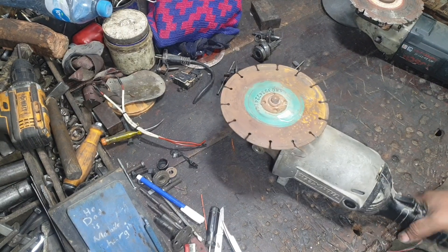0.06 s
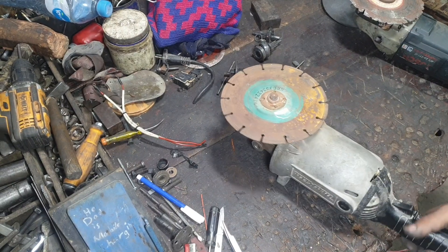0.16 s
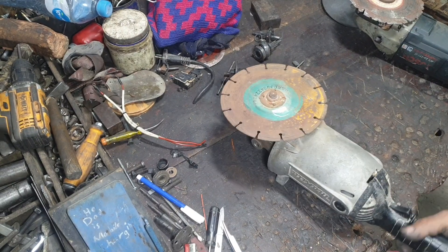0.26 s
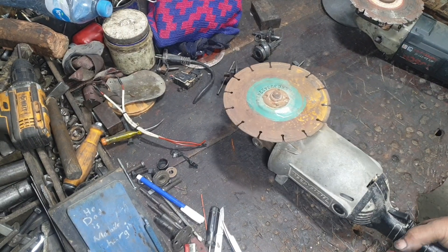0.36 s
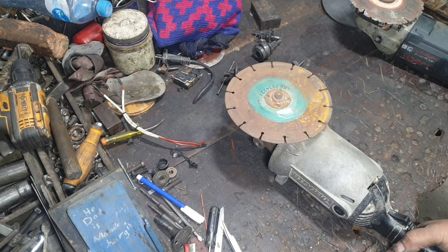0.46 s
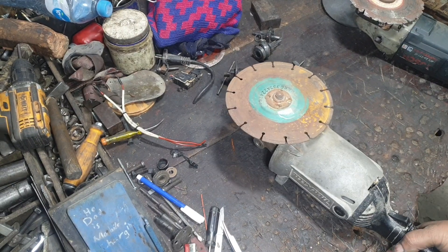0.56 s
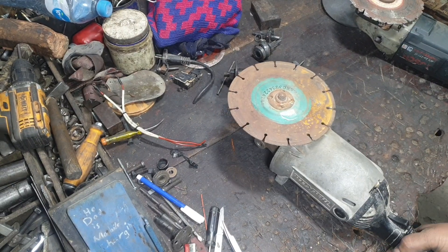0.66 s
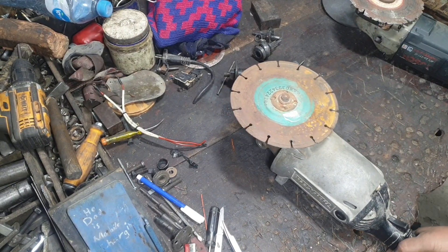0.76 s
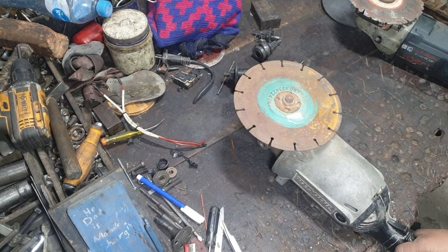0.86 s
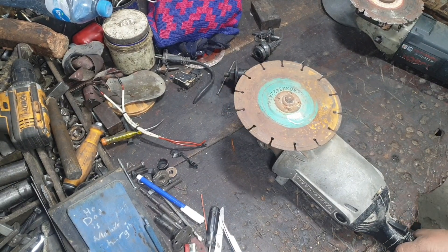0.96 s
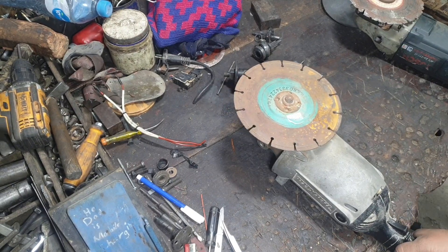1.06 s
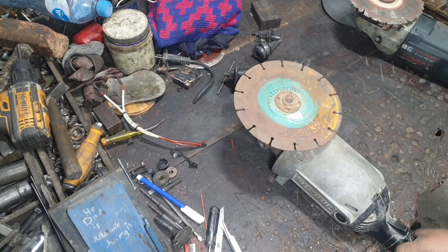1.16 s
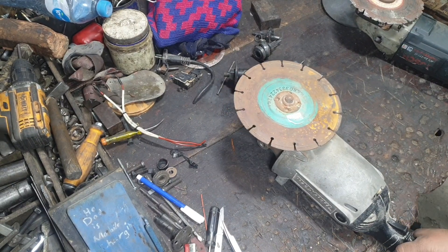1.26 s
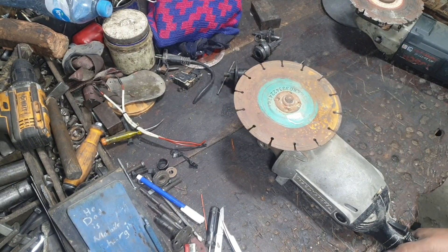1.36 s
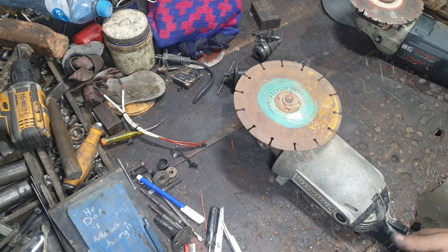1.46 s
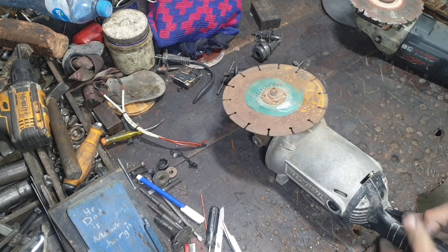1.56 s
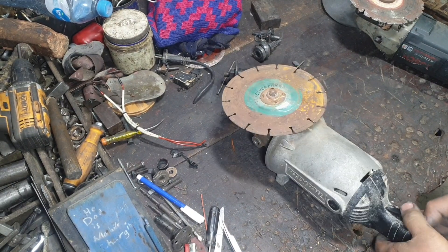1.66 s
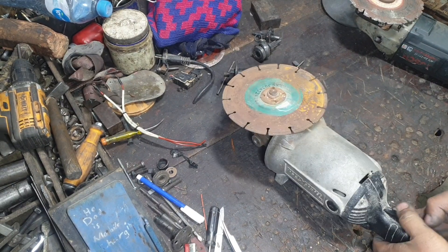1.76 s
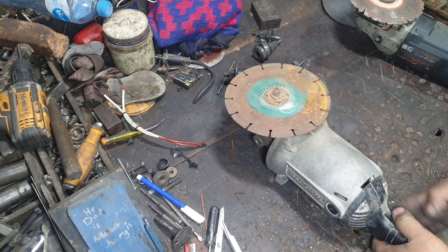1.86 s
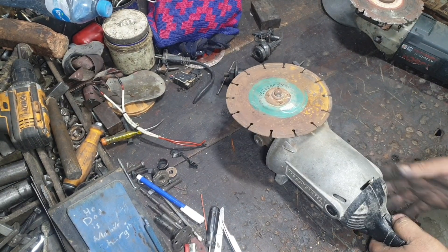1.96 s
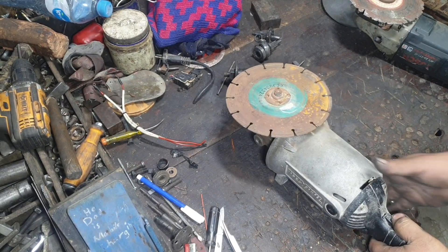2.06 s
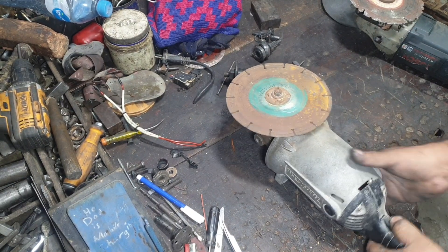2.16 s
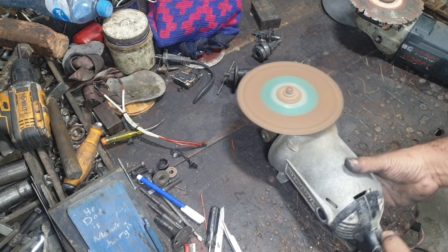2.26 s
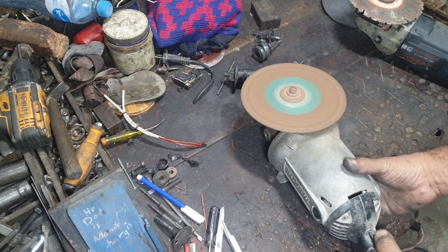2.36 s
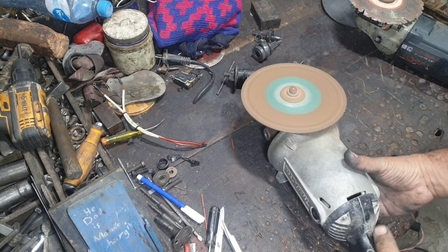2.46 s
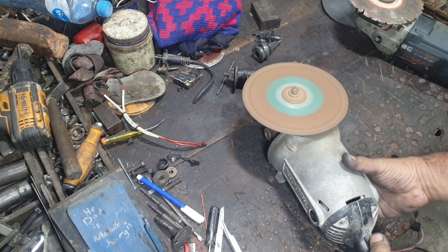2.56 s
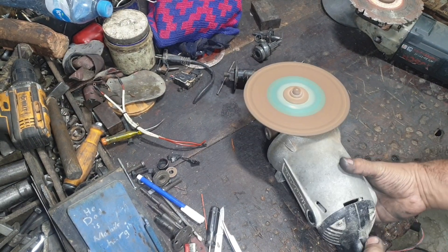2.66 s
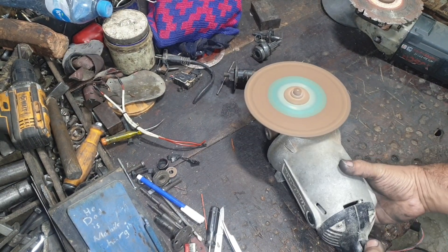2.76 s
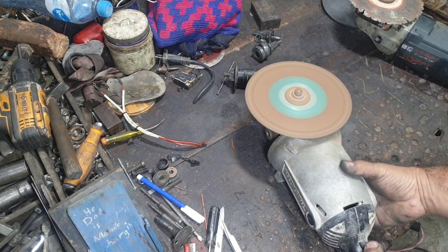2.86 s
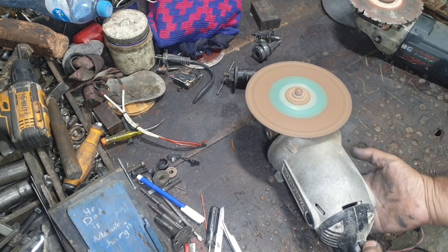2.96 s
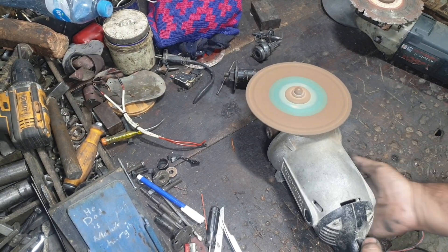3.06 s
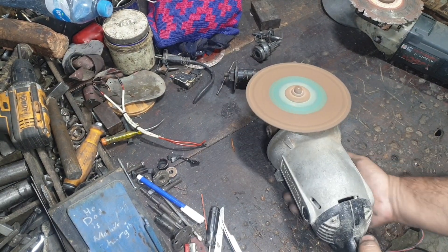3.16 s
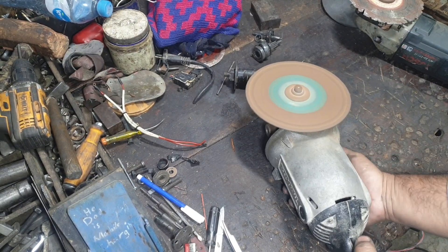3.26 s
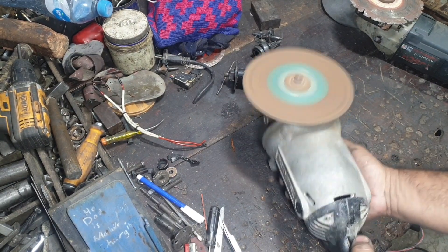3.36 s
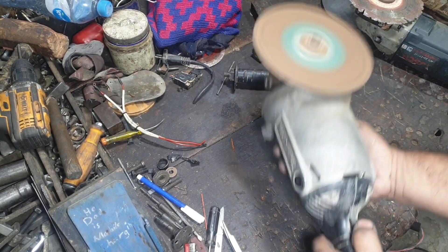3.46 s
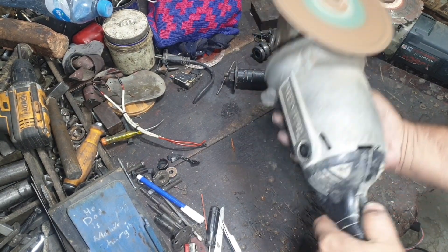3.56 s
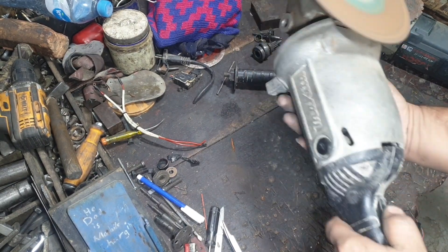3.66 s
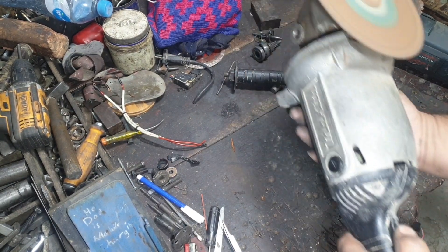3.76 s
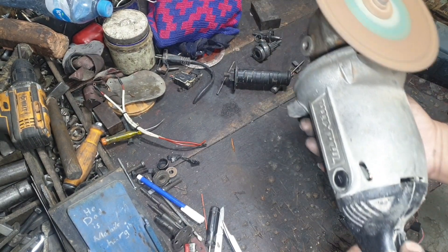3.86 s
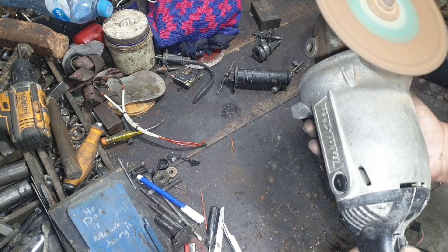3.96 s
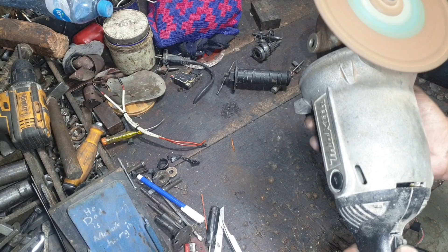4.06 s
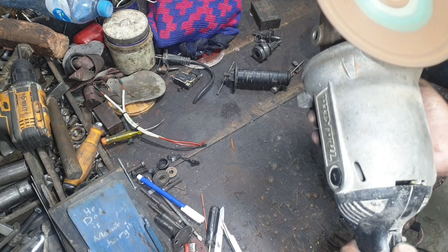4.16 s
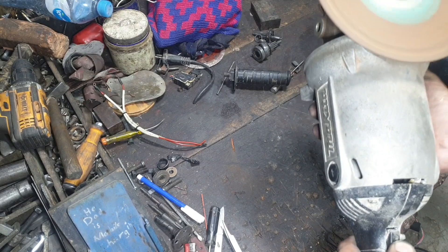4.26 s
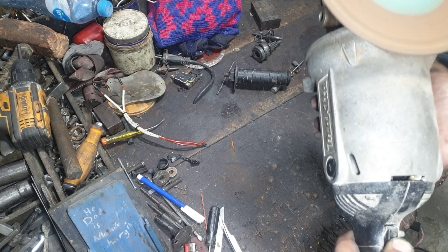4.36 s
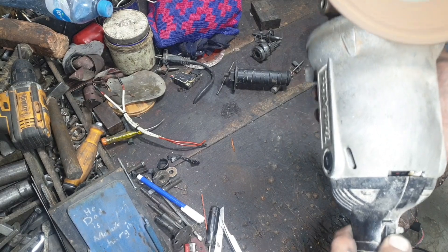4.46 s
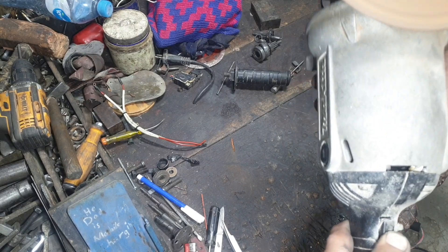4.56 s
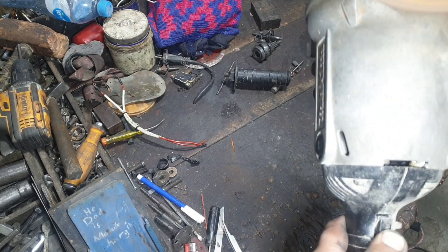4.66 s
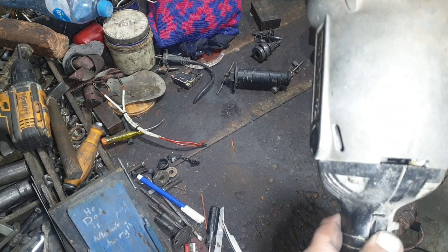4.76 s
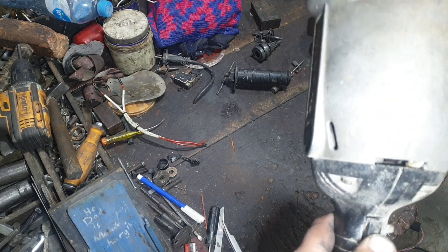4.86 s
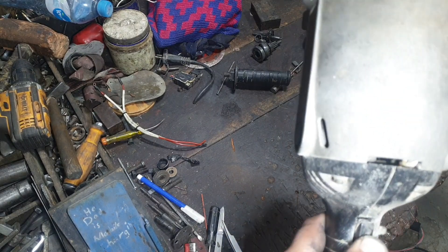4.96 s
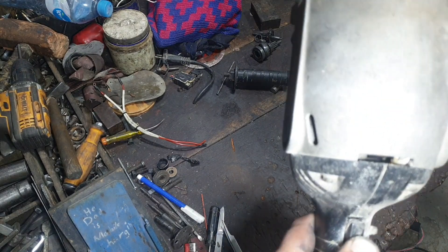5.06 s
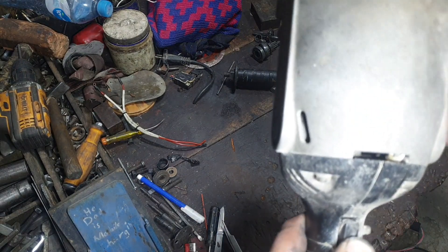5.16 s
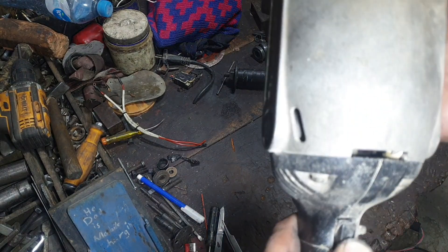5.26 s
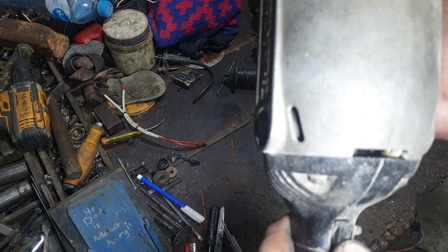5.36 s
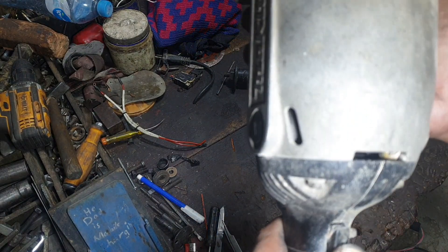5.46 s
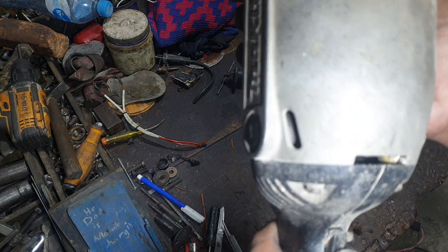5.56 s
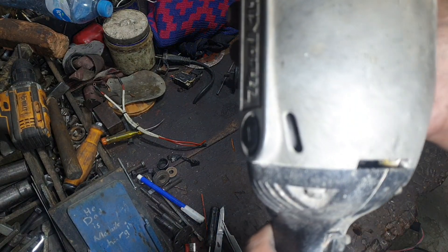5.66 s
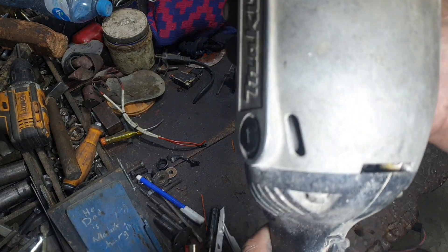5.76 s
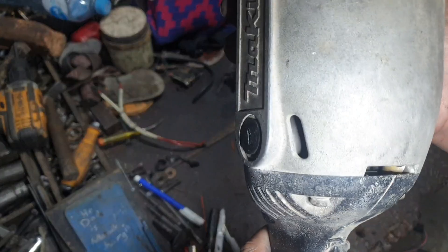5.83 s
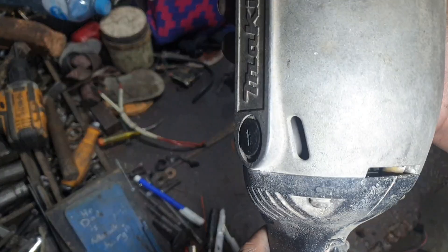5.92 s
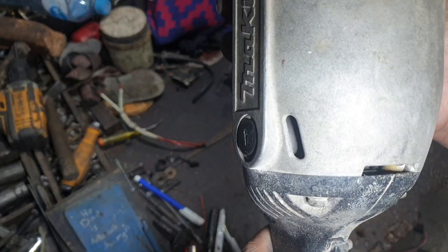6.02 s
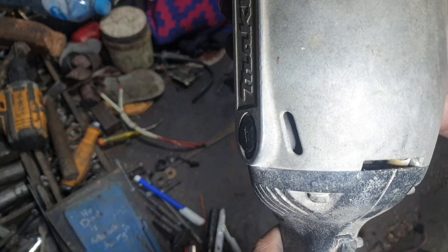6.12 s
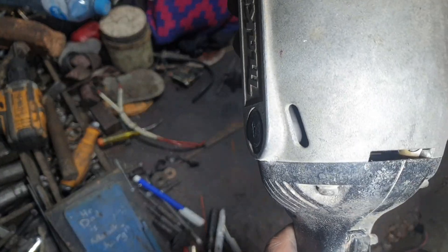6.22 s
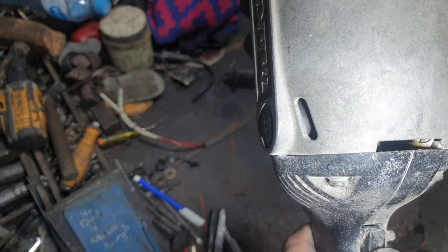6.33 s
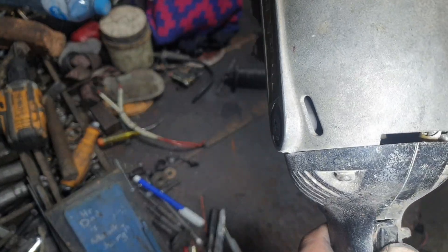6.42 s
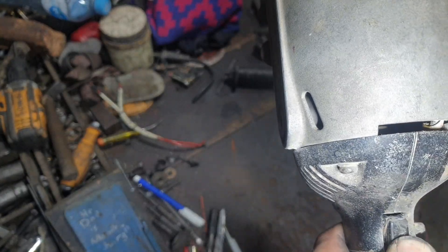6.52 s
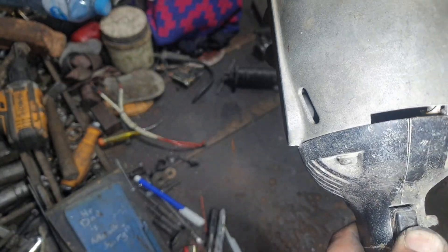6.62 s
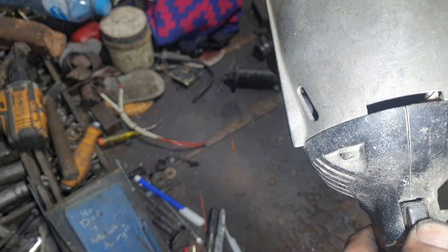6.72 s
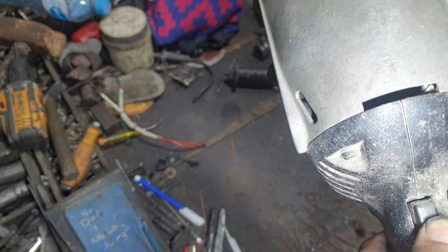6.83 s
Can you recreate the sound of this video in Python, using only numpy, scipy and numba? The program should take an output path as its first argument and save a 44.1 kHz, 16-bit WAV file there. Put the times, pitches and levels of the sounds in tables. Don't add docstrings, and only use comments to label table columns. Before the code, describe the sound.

After soft rustles and small clicks, a big grinder kicks into life on a metal bench, sags in pitch, then surges to a full whining roar.

```python
import sys
import numpy as np
from scipy import signal
from scipy.fft import rfft, irfft, next_fast_len
from scipy.io import wavfile
from scipy.ndimage import uniform_filter1d, map_coordinates
from numba import njit

SR = 44100
rng = np.random.default_rng(int(sys.argv[2]) if len(sys.argv) > 2 else 0)


def gain_from_decibels(decibels):
    exponent = np.asarray(decibels, float) / 20
    return 10 ** exponent


def transcribe(signal):
    frames = np.atleast_2d(signal).T
    limited = np.clip(frames, -1, 1)
    pcm = np.round(limited * 32767).astype(np.int16)
    wavfile.write(sys.argv[1], SR, pcm)


N = 303849
T = np.arange(N) / SR
SIZE = next_fast_len(N)
HZ = np.arange(SIZE // 2 + 1) * SR / SIZE


# [f/Hz, left minus right level/dB]
PORT_BALANCE = [(60, -4), (400, -9), (800, -4.5), (2400, -6.5), (4400, -12), (6000, -16.5), (7300, 0),
                (8700, 23), (10500, 4), (15000, 5.5)]
# [f/Hz, correlation]
PORT_LIKENESS = [(60, 1), (300, 0.88), (640, .97), (1400, 0.62), (3000, 0.22), (9000, 0.087)]

# [f/Hz, level/dB per Hz]
DRONE_COLOUR = [(15, -49), (25, -28), (37, -18), (54, -2), (99, 5), (128, 1.5), (150, -5), (200, -68),
                (330, -120)]
RUMBLE_COLOUR = [(82, -47), (140, -2), (162, -2), (210, -6.5), (286, -8.5), (500, -18.5), (650, -47),
                 (1100, -120)]
HISS_COLOUR = [(380, 3), (500, 0), (1300, -1.5), (2900, -9.5), (4200, -13), (5400, -10.5), (6300, -18),
               (7400, -29), (10500, -26), (12500, -33), (15500, -40)]
RUSTLE_COLOUR = [(1800, 5), (3500, 0), (5500, 4), (7500, -15), (10500, -12), (13000, -12), (15500, -14)]
# [peak t/s, rise t/s, fall t/s, level/dB]
DRONE_SWELLS = [
    (.05, .3, 0.076, -39.5),
    (.52, 0.19, 0.1, -58),
    (.93, 0.14, 0.12, -47),
]
HISS_SWELLS = [
    (.3, 0.65, 0.49, -71),
    (.97, .03, .05, -66),
]
RUSTLE_SWELLS = [
    (.29, 0.069, .2, -77),
    (.986, .01, .05, -67),
    (1.652, .003, 0.02, -59),
    (1.72, 0.11, 0.09, -59.5),
    (1.83, 0.04, 0.035, -57),
    (2.04, .02, .03, -66),
    (2.275, .02, .1, -70),
]
HAND_RUB = [
    (1.93, 0.074, 0.073, -64),
    (2.08, .06, .06, -53.5),
]
# [f/Hz, swells (peak t/s, rise t/s, fall t/s, level/dB)]
ENGINE_NOTES = [
    (116.3, [(.3, .35, 0.25, -42), (.55, 0.068, 0.13, -43)]),
    (95, [(.1, .1, .1, -46), (1.05, 0.046, .1, -42), (1.8, 0.14, 0.18, -46)]),
    (136, [(.88, 0.077, 0.15, -41.5), (1.2, .1, 0.089, -48), (1.45, 0.071, 0.19, -46.5), (1.92, 0.099, 0.045, -47), (2.12, .07, 0.051, -43)]),
    (68.6, [(1.35, .06, .06, -48), (1.97, 0.091, 0.067, -57), (2.2, 0.086, 0.13, -50)]),
]
# [t/s, f/Hz, level/dB]
SCRAPE_PATH = [
    (.43, 5200, -80),
    (.46, 4600, -60),
    (.49, 3700, -59),
    (.53, 2900, -82),
]

# [t/s, peak level/dB, centre f/Hz, 60 dB decay t/s, thud level/dB]
CLICKS = [(0.9855, -42, 5990, 0.046, -22), (0.502, -46, 2900, .08, -70), (1.798, -36, 4100, 0.03, -47),
          (1.8103, -37, 4600, 0.046, -48), (2.0263, -45, 5800, 0.076, -34), (2.2843, -26, 4940, 0.049, -46),
          (2.304, -9, 3570, 0.038, -21), (2.3048, -1, 1510, 0.023, -34), (2.8448, -13, 4160, 0.046, -43),
          (2.8853, -9, 4060, 0.04, -44), (2.9194, -9, 3930, 0.04, -42), (3.9479, -14, 4960, 0.053, -42)]
# [f/Hz, level/dB, 60 dB decay t/s]
SMALL_PART = [(5860, -9, 0.08), (7400, -16, .05), (9502, -4, 0.09), (11680, -12, 0.058), (12450, -16, 0.06),
              (14640, -12, 0.05)]

# [t/s, f/Hz, peak level/dB, 60 dB decay t/s]
BENCH_THUMPS = [(2.354, 275, -17, 0.17), (2.372, 354, -14, .1), (2.395, 440, -23, .08),
                (2.41, 505, -17, .1), (2.445, 322, -26, .08), (2.49, 267, -24, 0.068),
                (2.516, 479, -19, 0.13), (2.575, 273, -22, .12), (2.92, 513, -28, .1),
                (3.225, 476, -26, .15), (3.306, 473, -26, .12), (3.335, 690, -24.5, 0.18),
                (3.345, 294, -34, .1)]
# [peak t/s, rise t/s, fall t/s, level/dB]
CHATTER_SWELLS = [
    (2.307, 0.0035, 0.071, -11.5),
    (2.37, 0.034, 0.11, -16),
]
# [f/Hz, level/dB per Hz]
CHATTER_COLOUR = [(200, -3.5), (500, -13), (1400, 4.5), (2500, -11), (3600, 3), (6000, -9), (9000, -32)]
# [peak t/s, rise t/s, fall t/s, level/dB]
DRUM_SWELLS = [
    (2.36, 0.043, 0.084, -16.5),
    (2.56, 0.057, 0.02, -30.5),
    (2.74, 0.13, 0.044, -28.5),
    (2.91, 0.054, .08, -45),
    (3.21, 0.13, 0.085, -31),
    (3.37, 0.13, 0.07, -29.5),
]
DRUM_OCTAVE = [
    (2.45, .05, 0.035, -35),
    (2.6, 0.066, 0.042, -34),
    (2.72, 0.035, 0.054, -42),
]

# [t/s, fan blade-pass f/Hz]
FAN_SPEED = [(2.3, 490), (2.45, 1950), (2.57, 2660), (2.65, 2917), (2.73, 3095), (2.83, 3235), (3.05, 3030),
             (3.5, 2678), (3.94, 2365), (4.15, 3025), (4.35, 3337), (4.5, 3485), (4.65, 3601), (4.85, 3700),
             (5.05, 3772), (5.5, 3882), (6.1, 3955), (6.89, 3997)]
# [from t/s, to t/s]
SWITCH_ON = [
    (2.303, 2.3),
    (3.948, 6.5),
]
TURN_MULTIPLES = [1.0, .385, 1.19, 3.0, 15.1]
# [peak t/s, rise t/s, fall t/s, level/dB]
FAN_WHINE = [(2.64, .06, 0.074, -42), (2.8, 0.056, .08, -40), (3.16, .13, 0.12, -32), (3.2, .6, .3, -48),
             (3.45, 0.11, .1, -50), (3.77, 0.069, 0.063, -36.5), (3.91, 0.068, .025, -35),
             (4.36, .06, .05, -46), (4.5, 0.033, .03, -33), (4.62, 0.074, .06, -36), (4.7, .3, .4, -41),
             (4.75, 0.028, 0.041, -31), (4.86, .03, .03, -34), (5.04, .04, 0.061, -35), (5.2, .1, .1, -47),
             (5.37, .08, .12, -38), (5.58, 0.071, 0.2, -34), (6.05, 0.22, 0.31, -32.5),
             (6.55, 0.23, 0.29, -31), (6.86, 0.1, .2, -28)]
ARMATURE_SWELLS = [
    (2.8, .17, .1, -35),
    (3.08, .12, .1, -39),
    (4.4, .2, .15, -45),
    (5.7, .5, 2.5, -44),
]
BEAT_SWELLS = [
    (3.33, .2, 0.06, -42),
    (4.58, 0.22, 0.08, -37),
]
THIRD_SWELLS = [
    (2.66, .06, .06, -40),
    (2.88, .12, .1, -40),
    (3.17, .1, .07, -37),
]
MESH_SWELLS = [
    (3.24, .07, .07, -38),
    (3.52, .06, .05, -43),
    (3.64, .04, .04, -43),
    (3.8, .05, .04, -42),
    (3.91, .04, .03, -39),
]

# [f/Hz, width f/Hz, level/dB]
BLADE_PAIRS = [
    [(1265, 16, -2), (1325, 30, 10)],
    [(3640, 44, 3), (3580, 50, -3)],
]
# [peak t/s, rise t/s, fall t/s, level/dB]
LOW_RING_SWELLS = [
    (2.31, .01, .05, -29),
    (2.41, .04, .05, -28.5),
    (2.53, .06, .08, -37),
    (3.55, .04, .08, -41),
    (3.95, .015, .08, -36),
    (4.12, .08, .2, -36),
]
HIGH_RING_SWELLS = [
    (2.31, .01, .04, -30),
    (2.37, .02, .05, -25),
    (2.46, .05, .12, -27),
    (2.65, .06, .06, -36),
    (3.2, .12, .14, -34),
    (3.48, .08, .08, -38),
    (3.97, .02, .06, -33),
    (4.15, .06, .08, -36),
]
RESTART_SWELLS = [
    (3.93, .01, .03, -33),
    (3.98, .025, .04, -29),
    (4.05, .1, .2, -33),
    (4.11, .04, .06, -31),
    (4.3, .06, .08, -36),
    (4.53, .05, .05, -36),
]

# [f/Hz, level/dB per Hz]
BENCH_COLOUR = [(71, -31), (120, 7), (135, -4), (182, -5), (259, -3.5), (381, -5.5), (485, 2), (848, -13),
                (1200, -8), (1560, -37), (2640, -120)]
CASING_COLOUR = [(71, -26), (120, -8), (156, -16.5), (297, -4), (329, -5.5), (621, -4), (800, -13),
                 (1040, -9.5), (1760, -120)]
FAN_FAR_COLOUR = [(350, -22), (600, -7.5), (719, -3), (1160, -8.5), (1290, -4), (1570, -1), (2130, 1),
                  (2640, -1), (2920, -3), (4300, 0), (5590, -13.5), (9460, -120)]
FAN_NEAR_COLOUR = [(350, -8.5), (600, -17), (814, -3), (1250, -3), (1460, -0.5), (2240, -0.5), (3120, -3),
                   (3930, -0.5), (4300, -1.5), (5590, -22), (9460, -120)]
# [f/Hz, level/dB per Hz]
SLOT_COLOUR = [(1940, -3.5), (3300, -13), (3780, -3), (3840, -10.5), (4540, 1.5), (5950, 0), (7370, -11.5),
               (8200, -14.5), (10700, -38), (18000, -120)]
VENT_COLOUR = [(4120, -12), (7000, 0), (7560, -4.5), (8720, -0.5), (11200, -5), (14600, -17), (22000, -120)]
BRUSH_COLOUR = [(6060, -28), (10300, -3), (11500, -1), (12500, 0), (13500, -1), (15400, -2)]
# [f/Hz, width f/Hz, level/dB]
PLATE_MODES = [(182, 20, -7), (273, 41, -1), (334, 28, 3), (477, 32, -8), (710, 72, -1)]
# [t/s, vents nearer level/dB, blade nearer level/dB]
HOLDING = [(2.6, 0.5, -0.5), (2.85, 1, 0), (3.15, 0.5, 2), (3.35, -2, 1), (3.89, 1.5, 1), (4.15, 2.5, 5),
           (4.4, 2, 2.5), (4.7, 2.5, 3.5), (5.3, 3.5, 0.5), (6.15, 4.5, -3), (6.84, 2.5, -2.5),
           (6.89, 2.5, -6)]
# [peak t/s, rise t/s, fall t/s, level/dB]
JERKS = [
    (2.308, 0.0052, 0.0093, 4),
    (2.365, 0.028, 0.14, 0),
    (2.53, 0.015, 0.02, -10),
    (2.59, 0.012, 0.013, -19),
    (3.23, 0.037, 0.045, -18),
    (3.33, 0.031, 0.026, -33),
    (3.96, 0.015, 0.048, -27),
]
GEAR_CLANKS = [
    (2.315, 0.0057, 0.07, -5),
    (2.843, 0.004, 0.0039, 5),
    (2.886, .004, 0.0062, -9),
    (2.92, .004, 0.0073, -19),
    (2.9, 0.035, .15, -39),
    (3.02, 0.0091, .015, -17),
    (3.2, 0.0054, 0.0076, -16),
]
# [peak t/s, rise t/s, fall t/s, level/dB]
WHISTLE_SWELLS = [
    (2.8, .2, 0.27, -11),
    (4.45, 0.31, 0.25, 0),
    (5.9, 0.51, .9, -2.5),
]
SIZZLE_SWELLS = [
    (2.33, .02, .12, 0),
    (2.88, .04, .5, 2),
    (3.6, .45, .3, 1),
]
# [level/dB at 3000 Hz blade-pass, dB per dB speed, dB per dB nearness, jerk
# level/dB, clank level/dB]
CASING_LOUDNESS = (-40.5, 1.22, 0.32, -26.5, -62)
FAN_LOUDNESS = (-26, 0.9, 0.94, -33.5, -31.5)
VENT_LOUDNESS = (-37.5, 1.5, 1.5, -40, -54)
SLOT_LOUDNESS = (-25.5, 2, 0.5, -31, -30)
BRUSH_LOUDNESS = (-35, 1, 0.2, -46, -33.5)

LIFT_S = 3.38
START_S = SWITCH_ON[0][0]
DRUM_HZ = 96
FAN_BLADES = 12
LEFT_LAG_S = 0.00014


def curve(table):
    s, *columns = np.transpose(table)
    return [np.interp(T, s, column) for column in columns]


def on_log(table, hz, outside=None):
    f, values = np.transpose(table)
    return np.interp(np.log(hz + 1), np.log(f), values, outside, outside)


def unit(x):
    return x / np.sqrt(np.mean(np.atleast_2d(x).mean(axis=0) ** 2))


def swells(table):
    total = 0
    for s, rise, fall, db in table:
        width = np.where(T < s, rise, fall)
        total = total + gain_from_decibels(db) * np.exp(-((T - s) / width) ** 2)
    return total


def walk(rate):
    k = int(SR / rate)
    held = np.repeat(rng.standard_normal(N // k + 1), k)
    return 1.75 * uniform_filter1d(uniform_filter1d(held, k), k)[:N]


def tone(hz, wobble_db, rate):
    return np.sqrt(2) * np.sin(2 * np.pi * np.cumsum(hz) / SR) * gain_from_decibels(wobble_db * walk(rate))


def ports(spectra, lag_s=LEFT_LAG_S):
    left = gain_from_decibels(on_log(PORT_BALANCE, HZ))
    delayed_left = left * np.exp(-2j * np.pi * HZ * lag_s)
    gain = np.array([delayed_left, 1 + 0 * HZ]) / np.sqrt((1 + left ** 2) / 2)
    return irfft(spectra * gain, SIZE)[:, :N]


def noise(colour, direct=0.59, lag_s=LEFT_LAG_S):
    alike = np.clip(on_log(PORT_LIKENESS, HZ / direct), 0, 1)
    mid, side = rfft(rng.standard_normal((2, SIZE))) * np.sqrt([1 + alike, 1 - alike])
    coloured = np.array([mid + side, mid - side]) * gain_from_decibels(on_log(colour, HZ, -200))
    return unit(ports(coloured, lag_s))


@njit
def svf(x, hz, width):
    y, b, l = np.empty(len(x)), 0., 0.
    for i in range(len(x)):
        g, k = np.tan(np.pi * hz[i] / SR), width / hz[i]
        v = (b + g * (x[i] - l)) / (1 + g * (g + k))
        b, l, y[i] = 2 * v - b, l + 2 * g * v, k * v
    return y


def resonate(pair, hz, width_hz):
    return np.array([svf(x, hz + np.zeros(len(x)), width_hz) for x in pair])


def distant_drone():
    drone = noise(DRONE_COLOUR, lag_s=0.00023)
    drone = drone * gain_from_decibels(0.22 * walk(14)) * (gain_from_decibels(-47.5) + swells(DRONE_SWELLS))
    notes = 0
    for hz, table in ENGINE_NOTES:
        unsteady_hz = hz * (1 + 0.0095 * walk(7.02))
        notes = notes + tone(unsteady_hz, wobble_db=1.0, rate=12.6) * swells(table)
    return drone + ports(rfft(notes, SIZE), lag_s=0.00021)


def hand_rub():
    band = resonate(resonate(noise(HISS_COLOUR), 1330.0, 120.0), 1280.0, 70.0)
    return swells(HAND_RUB) * gain_from_decibels(3.7 * walk(30.1)) * unit(band)


def scrape():
    hz, db = curve(SCRAPE_PATH)
    rough = rng.standard_normal((2, N))
    band = resonate(resonate(rough, hz, 2000.0), hz, 2000.0)
    return gain_from_decibels(db) * unit(band)


def shop():
    gain_up_s = 1.648
    up = np.clip((T - gain_up_s) / 0.0022, 0, 1)
    duck = np.clip((T - START_S) / 0.1, 0, 1)
    gain = gain_from_decibels(7 * up - 12 * duck)
    bass_gain = np.roll(gain, int(0.011 * SR))
    rumble = noise(RUMBLE_COLOUR, direct=0.72, lag_s=0.00017) * gain_from_decibels(-51 + 1.4 * walk(21.1))
    settle_db = 2.5 * up * np.exp(-((T - gain_up_s) / 0.24) ** 2)
    hiss = noise(HISS_COLOUR, direct=0.39, lag_s=0.00032) * gain_from_decibels(settle_db + 3.0 + walk(9.3))
    hiss = hiss * (gain_from_decibels(-59) + swells(HISS_SWELLS))
    rustle = noise(RUSTLE_COLOUR) * gain_from_decibels(1.2 * walk(40.8)) * (gain_from_decibels(-89) + swells(RUSTLE_SWELLS))
    return bass_gain * (distant_drone() + rumble) + gain * (hiss + rustle) + hand_rub() + scrape()


def first_knock():
    knock_s = CLICKS[0][0]
    age = np.arange(SR // 4) / SR
    ring = np.zeros(N)
    part = ring[int(knock_s * SR):][:len(age)]
    for hz, db, t60 in SMALL_PART:
        part += gain_from_decibels(db - 60 * age / min(t60, 0.09)) * np.sin(2 * np.pi * hz * age)
    bounce = gain_from_decibels(-7) * np.roll(ring, int(0.018 * SR))
    ring = gain_from_decibels(-41.5) * (ring + bounce)
    bend = gain_from_decibels(-19 - 60 * age / 0.035) * np.minimum(age / 0.003, 1)
    bend = bend * np.sin(2 * np.pi * 175 * (age - 0.0035))
    ring[int((knock_s - 0.004) * SR):][:len(age)] += bend
    return ports(rfft(ring, SIZE))


def taps():
    out, age = np.zeros((2, N)), np.arange(SR // 4) / SR
    thud = noise([(90, -9), (200, 9.0), (550, -9), (1500, -27)], direct=3.1)
    crack = noise([(1000, 3.0), (15500, -16.0)])
    for s, db, hz, t60, thud_db in CLICKS:
        at = slice(int(s * SR), int(s * SR) + len(age))
        ringing = resonate(resonate(crack[:, at], hz, 0.3 * hz), hz, 0.22 * hz)
        click = unit(0.02 * crack[:, at] + ringing) * gain_from_decibels(db - 5.5 - 60 * age / t60)
        dull = thud[:, at] * gain_from_decibels(thud_db - 6.0 - 60 * age / 0.11)
        out[:, at] += np.minimum(age / 0.00076, 1) * (click + dull)
    return out + first_knock()


def bumps():
    rings = np.zeros(N)
    for s, hz, db, t60 in BENCH_THUMPS:
        at = slice(int(s * SR), int(s * SR) + SR // 4)
        age = np.clip(T[at] - s, 0, 1)
        loudness = gain_from_decibels(db - 60 * age / t60) * np.minimum(age / 0.0037, 1)
        rings[at] += loudness * np.sin(2 * np.pi * hz * age)
    swing = (T - 2.3055) * DRUM_HZ % 1
    knock_shape = np.exp(-swing / 0.25) * np.minimum(swing / 0.037, 1)
    knocks = noise(CHATTER_COLOUR, direct=1.2) * knock_shape * swells(CHATTER_SWELLS)
    return ports(rfft(rings, SIZE)) + knocks


def bench_drum(turn_hz):
    spindle_hz = np.roll(turn_hz, int(0.07 * SR)) * TURN_MULTIPLES[1]
    drum_hz = DRUM_HZ + 0.9 * np.maximum(spindle_hz - DRUM_HZ, 0) * (T < LIFT_S)
    swing = swells(DRUM_SWELLS)
    drum = tone(drum_hz, wobble_db=0.3, rate=15) * swing
    octave_gain = swing * gain_from_decibels(-33.0) + swells(DRUM_OCTAVE)
    return drum + tone(2 * drum_hz, wobble_db=1.5, rate=39) * octave_gain


def shafts(turn_hz):
    whine_hz = turn_hz * FAN_BLADES * (1 + 0.0008 * walk(25))
    whine = tone(whine_hz, wobble_db=1.1, rate=59) * swells(FAN_WHINE)
    whine = whine * gain_from_decibels(np.array([[-9.0], [9.0]]))
    idle_db = (-58, -53, -67, -83, -43)
    tables = (ARMATURE_SWELLS, [], BEAT_SWELLS, THIRD_SWELLS, MESH_SWELLS)
    tones = []
    for order, db, table in zip(TURN_MULTIPLES, idle_db, tables):
        gain = gain_from_decibels(db) + swells(table)
        tones.append(tone(order * turn_hz, wobble_db=-0.5, rate=9.5) * gain)
    *low, mesh = tones
    low = sum(low) + bench_drum(turn_hz)
    return whine + mesh * gain_from_decibels(np.array([[-4.0], [3.0]])) + ports(rfft(low, SIZE))


def blade_ring():
    out = 0
    bursts = (LOW_RING_SWELLS, HIGH_RING_SWELLS)
    idle_levels_db, fades_db_s = (-44, -45), (-1, 9)
    for modes, table, idle_db, fade in zip(BLADE_PAIRS, bursts, idle_levels_db, fades_db_s):
        knocks = noise([(900, 0), (5000, 0)], direct=0.95) * gain_from_decibels(0.96 * walk(50))
        gain = swells(table) + gain_from_decibels(idle_db - fade * np.maximum(T - LIFT_S, 0))
        ringing = 0
        for hz, width, db in modes:
            ringing = ringing + gain_from_decibels(db) * resonate(resonate(knocks, hz, 5.3 * width), hz, 1.8 * width)
        out = out + gain * unit(ringing)
    song = tone(1322 * (1 + 0.003 * walk(20)), wobble_db=0.5, rate=30) * swells(RESTART_SWELLS)
    out = out + ports(rfft(song, SIZE))
    pan_db = -7 * np.clip((T - LIFT_S) / 0.23 + 1, 0, 1)
    return out * gain_from_decibels(np.array([pan_db, -pan_db]) / 2)


def loudness(law, turn_hz, near_db):
    db, by_speed, by_near, jerk_db, clank_db = law
    speed_db = 20 * np.log10(turn_hz * FAN_BLADES / 3000)
    steady = gain_from_decibels(db + by_speed * speed_db + by_near * near_db)
    return steady + gain_from_decibels(jerk_db) * swells(JERKS) + gain_from_decibels(clank_db) * swells(GEAR_CLANKS)


def casing_noise(gust, mains, spindle):
    lifted = np.clip((T - LIFT_S) / 0.11, 0, 1)
    rattle = noise(BENCH_COLOUR, direct=2.0) * (1 + 0.15 * mains + 0.3 * spindle)
    plate = 0
    for hz, width, db in PLATE_MODES:
        plate = plate + gain_from_decibels(db) * resonate(rattle, hz, 1.3 * width)
    rattle = unit(0.71 * rattle + plate)
    on_bench_db = 3
    casing = (1 - lifted) * gain_from_decibels(on_bench_db) * rattle + lifted * noise(CASING_COLOUR, direct=0.36)
    return casing * gain_from_decibels(0.38 * gust + 0.91 * walk(30))


def fan_noise(gust, mains):
    near = np.interp(T, (3.78, 4.98), [0, np.pi / 2])
    far_fan = np.cos(near) * noise(FAN_FAR_COLOUR, direct=0.79)
    near_fan = np.sin(near) * noise(FAN_NEAR_COLOUR, direct=0.98, lag_s=0.00003)
    return (far_fan + near_fan) * gain_from_decibels(0.4 * gust + 0.44 * walk(40)) * (1 + 0.096 * mains)


def slot_noise(turn_hz, gust, mains, spindle):
    slots, slot_hz = noise(SLOT_COLOUR), 2900 + 9.85 * turn_hz
    whistle = resonate(slots, slot_hz, 1900.0)
    facing = swells(WHISTLE_SWELLS) * resonate(whistle, slot_hz, 1000.0)
    slots = unit(1.4 * slots + 1.4 * whistle + facing)
    return slots * gain_from_decibels(0.5 * gust + 0.19 * walk(60)) * (1 + 0.069 * mains + 0.06 * spindle)


def vent_noise():
    return noise(VENT_COLOUR) * gain_from_decibels(0.38 * walk(18) + 0.25 * walk(70))


def brush_noise(mains):
    return noise(BRUSH_COLOUR) * gain_from_decibels(0.34 * walk(18) + 0.9 * walk(80)) * (1 + 0.11 * mains)


def air(turn_hz, powered):
    vents_db, blade_db = curve(HOLDING)
    spindle = np.cos(2 * np.pi * np.cumsum(turn_hz * TURN_MULTIPLES[1]) / SR)
    mains = powered * np.cos(2 * np.pi * 100 * T)
    mains = mains * (1 + 6.8 * np.clip(1 - turn_hz / 170, 0, 1))
    gust = walk(9)
    casing = casing_noise(gust, mains, spindle) * loudness(CASING_LOUDNESS, turn_hz, vents_db)
    fan = fan_noise(gust, mains) * loudness(FAN_LOUDNESS, turn_hz, vents_db)
    slots = slot_noise(turn_hz, gust, mains, spindle) * loudness(SLOT_LOUDNESS, turn_hz, blade_db)
    vent = vent_noise() * loudness(VENT_LOUDNESS, turn_hz, vents_db)
    brush = brush_noise(mains) * loudness(BRUSH_LOUDNESS, turn_hz, blade_db)
    sizzle = swells(SIZZLE_SWELLS) * resonate(brush, 13000, 2200.0)
    return casing + fan + slots + vent + brush + sizzle


def bench_echo(pair):
    echo_gain = gain_from_decibels(-13)
    late = []
    for x, lag_s in zip(pair, (0.0043, 0.0051)):
        path_s = lag_s + 0.000294 * walk(1.5)
        late.append(map_coordinates(x, [np.arange(N) - SR * path_s], order=3))
    return (pair + echo_gain * np.array(late)) / np.sqrt(1 + echo_gain ** 2)


def grinder():
    turn_hz = curve(FAN_SPEED)[0] / FAN_BLADES
    powered = sum((T > on) & (T < off) for on, off in SWITCH_ON)
    started = np.clip((T - START_S) / 0.0017, 0, 1)
    running = bench_echo(air(turn_hz, powered)) + blade_ring() + shafts(turn_hz) + bumps()
    return started * running


def scene():
    return shop() + taps() + grinder()


def roll_off(x):
    return signal.sosfilt(signal.butter(12, 15550, fs=SR, output="sos"), x)


def record(dry):
    mix = np.tanh(0.83 * dry) / 0.79
    return roll_off(mix)


dry = scene()
out = record(dry)
transcribe(out)
```